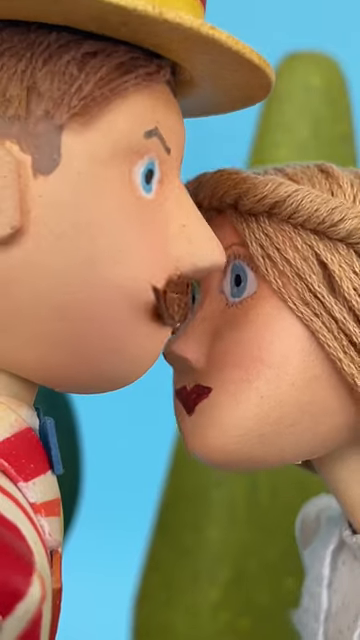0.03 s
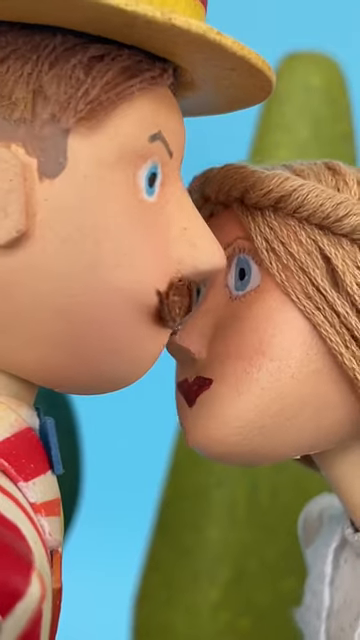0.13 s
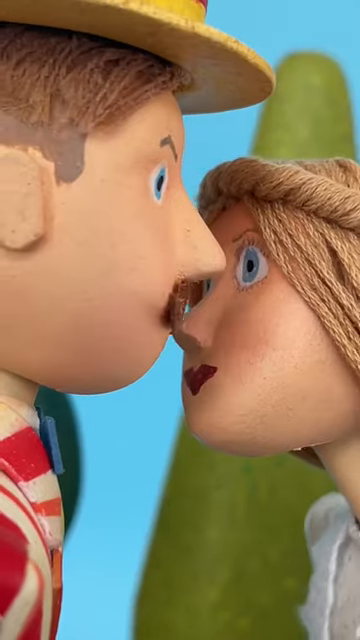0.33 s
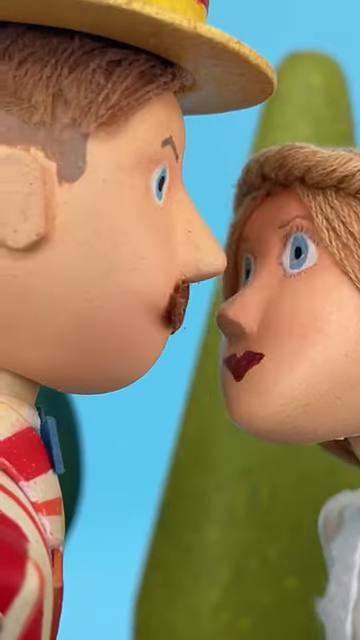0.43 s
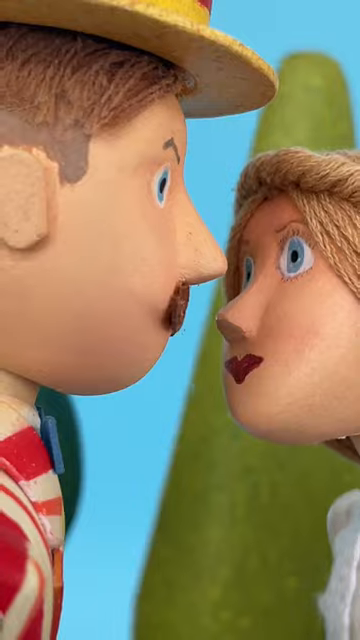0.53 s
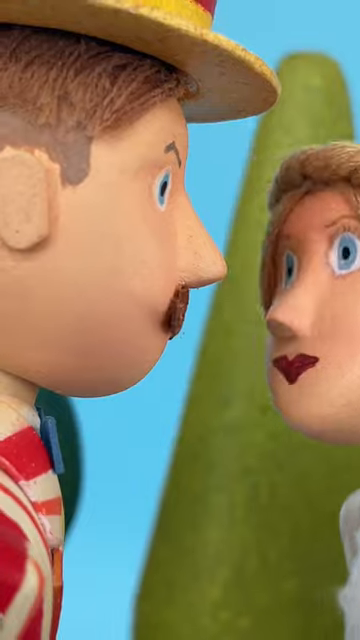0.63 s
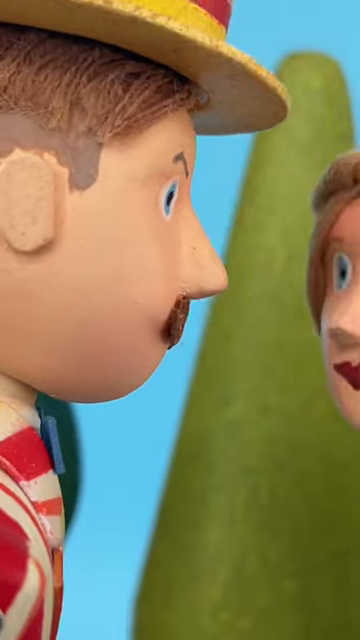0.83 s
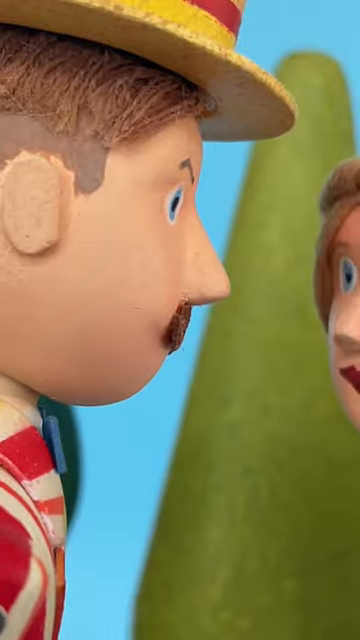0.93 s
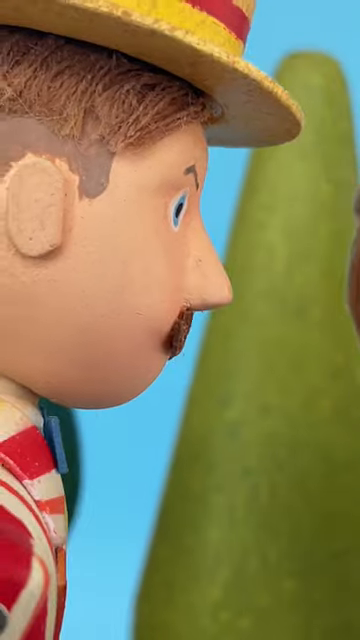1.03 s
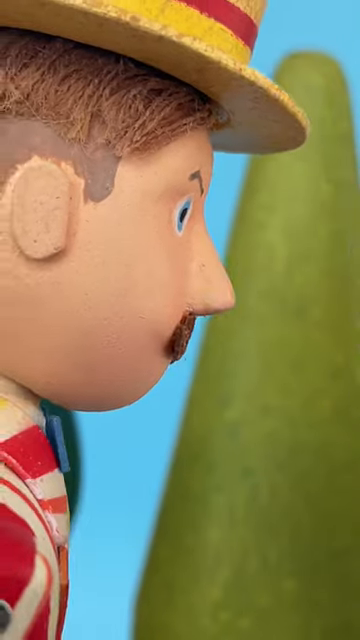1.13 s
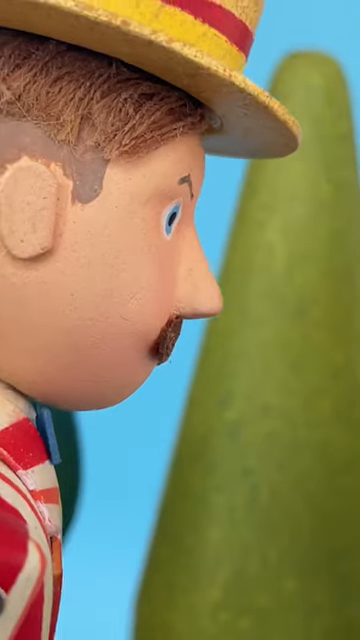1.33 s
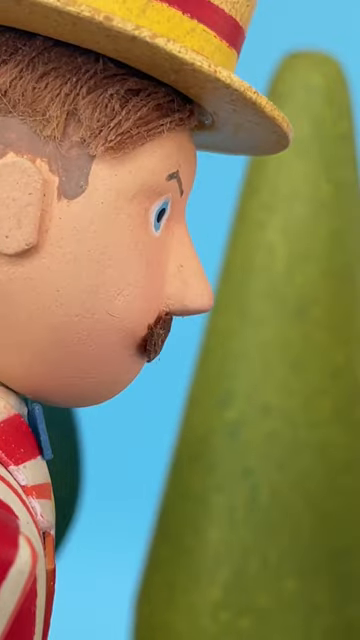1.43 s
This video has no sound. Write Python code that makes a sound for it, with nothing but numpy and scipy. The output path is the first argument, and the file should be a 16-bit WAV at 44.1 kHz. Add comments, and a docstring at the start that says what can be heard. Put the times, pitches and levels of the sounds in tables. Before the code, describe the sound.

A small mechanical figure clicks, clacks and squeaks as it moves in a quiet room.

```python
"""A small mechanical figure moves close to the microphone in a quiet room. From the start its drive rubs
and hums over low room noise, and cams and levers click in a wooden case. About a quarter second in, a dry
pivot slips with a sharp squeak. The frame groans and thumps softly as the load shifts, and a pawl (a small
catch) snaps down. After more clicks and squeaks near 0.7 s comes a lull. Soft groans return around 1 s,
a bunch of clicks follows near 1.2 s, and a few single clicks end the scene."""
import sys
import numpy as np
from scipy import signal
from scipy.fft import rfft, irfft
from scipy.io import wavfile
from scipy.ndimage import uniform_filter1d

SR = 44100
rng = np.random.default_rng(int(sys.argv[2]) if len(sys.argv) > 2 else 0)


def put_to_file(sound):
    """Save the sound as 16-bit audio at rate SR, in the file named by the first command-line argument."""
    columns = np.atleast_2d(sound).T  # one column per channel
    safe = np.clip(columns, -1, 1)
    whole_steps = np.round(safe * 32767)
    wavfile.write(sys.argv[1], SR, whole_steps.astype(np.int16))


N = 66150  # 1.5 seconds

# Tone of the room noise: frequency_hz, gain_db
ROOM_NOISE_TONE = [(25, -12), (55, 1.5), (130, 2.5), (400, -4), (900, -13), (1500, -24), (2200, -20.5),
                   (5000, -40), (10000, -36), (14000, -53.5)]
# Room echo (t60 is the time to fade by 60 dB): low_hz, high_hz, t60_s, gain_db
ECHO_BANDS = [(111, 413, 0.77, -3.5), (360, 2110, 0.41, -7.5), (1326, 4500, 0.14, -10.5),
              (2770, 11300, 0.32, -8), (9000, 23000, 0.12, -7)]
# How loudly the drive rubs over time: time_s, level_db
RUB_LEVELS = [(0, -70.5), (.09, -68), (.13, -60), (.18, -62.5), (.26, -62), (.38, -55), (.46, -69),
              (.62, -57), (.76, -76.5), (.9, -79), (.98, -64.5), (1.05, -77), (1.2, -57.5), (1.29, -75.5),
              (1.38, -69.5), (1.5, -64.5)]
# Tone of the rubbing: frequency_hz, gain_db
RUB_TONE = [(30, -17.5), (70, -4.5), (150, -6), (300, 12.5), (400, 3), (600, 4), (1000, 1), (1500, -9.5),
            (2200, -6.5), (3500, -12.5), (6000, -16), (10000, -29), (14000, -40.5)]
# Notes in the drive's hum at average load: pitch_hz, level_db
HUM_NOTES = [(107, -73), (140, -72.5), (220, -77.5)]
# Groans and thumps of the frame: peak_time_s, pitch_hz, rise_s, fall_s, level_db
FRAME_GROANS = [(0.116, 335.6, 0.0063, 0.032, -53), (.212, 326, 0.0096, 0.024, -47),
                (0.276, 222, 0.011, 0.18, -57.5), (0.323, 106, .035, 0.033, -56),
                (.31, 306.4, 0.031, 0.019, -50.5), (0.387, 101.6, 0.011, 0.017, -44.5),
                (0.412, 332, 0.0078, 0.034, -54), (0.418, 55, .04, 0.19, -56.5),
                (0.451, 125, 0.047, 0.058, -57), (.555, 296, 0.0057, 0.036, -55.5),
                (0.579, 139.8, 0.033, 0.029, -50.5), (0.98, 327.6, .012, 0.021, -50.5),
                (1.012, 311.8, 0.0089, 0.0078, -50.5), (1.038, 289, 0.0034, 0.009, -53),
                (1.181, 124.4, 0.016, 0.043, -58.5)]
# Squeaks of dry pivots: peak_time_s, pitch_hz, glide_hz_per_s, rise_s, fall_s, level_db
PIVOT_SQUEAKS = [(.014, 3870, -7, 0.0034, 0.019, -68), (.2414, 4185, -95000, 0.0024, .0031, -21.5),
                 (.3064, 3780, -10000, 0.0014, 0.00084, -40), (.3103, 3520, -55000, 0.0021, 0.0045, -35),
                 (.515, 2040, -6, 0.0025, 0.0079, -54.5), (0.6912, 1975, 2, 0.0014, 0.0014, -34.5),
                 (.6962, 2082, 7993, 0.0031, 0.0083, -33.5), (1.041, 3140, 0, 0.0064, 0.017, -60)]
# Drops of the pawl: start_s, level_db
PAWL_DROPS = [(.0626, -51), (.3698, -41), (.691, -58), (1.1782, -69), (1.1818, -62), (1.335, -63)]
# Notes the wooden case rings at: pitch_hz, t60_s, gain_db
CASE_MODES = [(138.5, 0.5, -2.5), (217.4, 0.86, -7.5), (280.9, 0.39, -2.5), (323.7, 0.2, -1.5),
              (427.3, 0.27, -8.5), (491.3, 0.2, -3), (599, 0.19, 0), (679, 0.064, 0.5), (817, 0.051, 6.5),
              (883, 0.055, 9), (983, 0.083, -7.5), (1174, 0.049, 5.5), (1700, 0.073, -1.5)]
# Notes a lever rings at: multiple_of_lever_pitch, t60_s, gain_db
LEVER_MODES = [(1, .018, 3), (1.07, 0.017, -2.5), (1.63, 0.021, -7), (2.3, 0.009, -15.5)]
# The four parts of a click (rows: knock, clack, snap, tick): low_hz, high_hz, decay_s, gain_db
CLICK_PARTS = [(574, 1090, 0.0017, -3.5), (1544, 2600, 0.0041, -10), (2870, 7190, 0.0022, -3.5),
               (6400, 8660, 0.0014, -7.5)]
# Cam and lever hits: start_s, scrape_s, knock_db, clack_db, snap_db, tick_db, lever_pitch_hz, lever_db
CLICK_HITS = [(0.0619, .0001, -84, -66, -59.5, -51, 3250, -59),
              (0.07, 0.0031, -60.5, -54, -63, -92, 2140, -61.5),
              (.1025, 0.0011, -52.5, -45, -49, -53.5, 2346, -47),
              (0.1944, 0.0035, -52, -65, -75, -88, 2040, -70), (.206, 0.01, -53, -67, -82, -78, 2190, -63),
              (0.2415, 0.002, -44, -47, -44, -46, 4120, -45), (.252, 0.0021, -45, -55, -50, -58, 2000, -43),
              (0.2692, 0.0022, -40, -52, -77, -72, 1890, -44),
              (0.2717, 0.00088, -46, -37, -46.5, -38.5, 3870, -42),
              (0.31, 0.00058, -59.5, -63, -52, -51, 2100, -58),
              (0.3686, 0.0011, -51, -63, -51, -42, 1720, -61),
              (0.3953, 0, -44.5, -49.5, -60, -89, 1147, -43.5),
              (.469, 0.00082, -51, -48, -51, -71, 4960, -48), (.5362, 0, -42, -47.5, -89, -91, 1637, -45.5),
              (.5409, 0.0014, -48.5, -51.5, -70, -95, 1980, -66),
              (0.593, 0, -62.5, -58, -71, -63, 2270, -71),
              (0.6078, 0.00088, -55.5, -44, -52, -55, 2194, -43),
              (.645, 0, -52.5, -47, -55.5, -67.5, 2360, -48), (0.6504, 0, -49, -50, -56.5, -71, 1920, -56),
              (.6898, 0.002, -49.5, -41, -57, -57, 2130, -47.5),
              (.7025, 0.0014, -39, -58, -86, -100, 995, -42.5), (.839, 0, -58, -81, -93, -81, 1500, -84),
              (0.8666, 0.0041, -74, -68, -72, -65.5, 1700, -68),
              (.886, 0.00038, -63, -62, -71, -66, 1760, -62.5),
              (0.9359, .0007, -50.5, -46.5, -53.5, -48, 2243, -49),
              (0.9586, 0, -53, -82, -66, -88, 1060, -58), (.967, 0.0013, -53.5, -69, -64, -79, 1700, -79),
              (.982, 0.00088, -66, -79, -60.5, -81, 2920, -56.5),
              (0.9932, 0.0017, -73, -59.5, -63, -74, 2430, -57.5),
              (1.0313, 0.0013, -67, -56.5, -66.5, -76, 3080, -58.5),
              (1.069, 0.0035, -51.5, -64, -75, -84, 1700, -75),
              (1.0935, 0, -71, -66, -62.5, -84, 3190, -57),
              (1.114, 0.0029, -57, -58.5, -68.5, -92, 1260, -58),
              (1.153, 0.0012, -50, -63, -65, -85, 1730, -52), (1.1772, 0, -40, -43, -44, -39, 4730, -46),
              (1.1812, .0001, -55, -51, -54, -52, 3320, -51),
              (1.2114, 0.0039, -48.5, -51.5, -55, -66, 2810, -48),
              (1.215, 0.00054, -47, -47, -56.5, -72, 2095, -46),
              (1.2195, .0005, -49.5, -53, -64, -79, 2290, -55),
              (1.269, 0.0017, -53.5, -55, -55.5, -49, 3260, -53.5),
              (1.335, 0.00081, -47, -45, -48.5, -50.5, 2870, -46.5),
              (1.461, 0.00017, -55.5, -55.5, -73, -82, 1860, -61.5),
              (1.473, 0.0051, -54, -54, -72, -65, 2160, -62.5)]
# How much louder the left side is than the right: frequency_hz, difference_db
LEFT_MINUS_RIGHT = [(40, 0), (125, -1.5), (250, -3), (500, -3.6), (1000, -.4), (2000, 0), (12000, .5)]
# How far the right side lags behind the left: frequency_hz, phase_radians
RIGHT_LAG = [(0, 0), (150, .13), (600, .7), (2000, .48), (4200, .85), (8800, 4.0), (10200, 4.3),
             (12500, 7.7)]

OPPOSITE_SIDES = np.array([[1], [-1]])  # adds a sound on the left and subtracts it on the right


def undb(db):
    """Turn decibels into a gain to multiply by."""
    return 10 ** (np.asarray(db) / 20)


def unit(x):
    """Scale a sound to an average strength (rms) of 1."""
    return x / np.sqrt(np.mean(x ** 2) + 1e-30)


def band(x, low_hz, high_hz, order=2):
    """Keep the part of a sound between two frequencies."""
    edges = [low_hz, min(max(high_hz, low_hz + 20), SR / 2 - 20)]
    return signal.sosfilt(signal.butter(order, edges, "band", fs=SR, output="sos"), x)


def shape_tone(x, points):
    """Turn lows and highs up or down along (frequency_hz, gain_db) points."""
    hz, db = np.array(points, float).T
    bins_hz = np.maximum(np.fft.rfftfreq(N, 1 / SR), 1)
    return irfft(rfft(x) * undb(np.interp(np.log(bins_hz), np.log(hz), db)), N)


def wobble(changes_per_s):
    """A smooth random wiggle with a typical size of 1."""
    hold = int(SR / changes_per_s)
    steps = np.repeat(rng.standard_normal(N // hold + 1), hold)
    return unit(uniform_filter1d(uniform_filter1d(steps, hold), hold)[:N])


def swell(t, rise_s, fall_s):
    """A rounded rise to t = 0 and a rounded fall after it."""
    return np.exp(-(t / np.where(t < 0, rise_s, fall_s)) ** 2)


def add(out, x, start_s):
    """Mix a short sound in at its time."""
    i = max(int(start_s * SR), 0)
    out[i:i + len(x)] += x[:max(N - i, 0)]


def even_energy(x, span_s=0.0094):
    """Give a burst as much energy as a steady level of 1 lasting span_s."""
    return x * np.sqrt(span_s * SR / np.sum(x ** 2))


def ring(modes, t, scatter):
    """A struck part's fading notes; random signs stand for where it is hit, pitch scatter for its load."""
    signs = rng.choice([-1, 1], len(modes))
    detunes = 1 + scatter * rng.standard_normal(len(modes))
    return sum(sign * undb(db) * np.sin(2 * np.pi * hz * detune * t) * np.exp(-np.log(1000) * t / t60)
               for (hz, t60, db), sign, detune in zip(modes, signs, detunes))


def room_noise(level_db=-64):
    """A low, steady rush, almost the same on both sides."""
    middle, side = (unit(shape_tone(rng.standard_normal(N), ROOM_NOISE_TONE)) for _ in range(2))
    return undb(level_db) * (middle + 0.13 * band(side, 250, 14400, order=1) * OPPOSITE_SIDES)


def room_echo(x, onset_s=0.00058, width=0.32):
    """Reflections blur into a short, dull tail that is a little different at each ear."""
    t = np.arange(N // 2) / SR
    tails = []
    for _ in range(2):
        response = 0
        for low_hz, high_hz, t60, db in ECHO_BANDS:
            fade = (1 - np.exp(-t / onset_s)) * np.exp(-np.log(1000) * t / t60)
            fading_noise = rng.standard_normal(len(t)) * fade / np.sqrt(np.sum(fade ** 2))
            response = response + undb(db) * band(fading_noise, low_hz, high_hz)
        tails.append(signal.fftconvolve(x, response)[:N])
    middle, side = tails
    return middle + width * side * OPPOSITE_SIDES


def drive(grains_per_s=5000, spread_db=3.5, waver_db=0.5, hum_follows=0.68):
    """Sliding parts rub in many tiny grains of sound over a wavering hum; both swell with the load."""
    t = np.arange(N) / SR
    load_db = np.interp(t, *np.array(RUB_LEVELS).T)
    grains = (rng.random(N) < grains_per_s / SR) * rng.choice([-1, 1], N)
    strengths = undb(spread_db * np.minimum(rng.exponential(size=N), 3))
    rub = unit(shape_tone(grains * strengths, RUB_TONE)) * undb(load_db)
    hum = sum(undb(db - waver_db * wobble(9.2)) * np.sin(2 * np.pi * hz * t + wobble(13.8))
              for hz, db in HUM_NOTES)
    return rub + hum * undb(hum_follows * (load_db - load_db.mean()))


def frame_groans(roughness=0.33):
    """The frame shudders briefly at one low pitch as the load shifts."""
    out = np.zeros(N)
    for peak_s, hz, rise_s, fall_s, db in FRAME_GROANS:
        t = np.arange(N) / SR - peak_s
        loudness = undb(db) * swell(t, rise_s, fall_s) * (1 + roughness * wobble(hz / 2))
        out += loudness * np.sin(2 * np.pi * hz * t + roughness * wobble(hz / 2))
    return out


def pivot_squeaks(jitter_radians=0.38, rasp=0.2, octave_db=-34):
    """A dry pivot slips for a moment and gives a slightly raspy squeak that can slide in pitch."""
    out = np.zeros(N)
    for peak_s, hz, glide, rise_s, fall_s, db in PIVOT_SQUEAKS:
        t = np.arange(N) / SR - peak_s
        phase = 2 * np.pi * (hz * t + glide * t ** 2 / 2) + jitter_radians * wobble(700)
        loudness = undb(db) * swell(t, rise_s, fall_s) * (1 + rasp * wobble(1500))
        out += loudness * (np.sin(phase) + undb(octave_db) * np.sin(2 * phase))
    return out


def pawl_drops(decay_s=0.00074):
    """A hard pawl drops with a dry, glassy crack about a millisecond long."""
    out, t = np.zeros(N), np.arange(N // 50) / SR
    for start_s, db in PAWL_DROPS:
        hiss = unit(band(rng.standard_normal(len(t)), low_hz=6440, high_hz=11100))
        add(out, hiss * np.exp(-t / decay_s) * undb(db), start_s)
    return out


def cam_and_lever_clicks(attack_s=0.00024, case_gain_db=-7, lever_gain_db=-6.5):
    """Each hit is a crack of noise, longer if it scrapes, that sets the case and one lever ringing."""
    knocks, ticks, t = np.zeros(N), np.zeros(N), np.arange(8192) / SR
    layers = (knocks, knocks, knocks, ticks)  # the bright ticks stay apart so they can get less echo
    for start_s, scrape_s, *parts_db, lever_hz, lever_db in CLICK_HITS:
        push = 1 - np.exp(-t / (attack_s + scrape_s))
        for (low_hz, high_hz, decay_s, gain_db), db, layer in zip(CLICK_PARTS, parts_db, layers):
            burst = rng.standard_normal(len(t)) * push * np.exp(-t / (decay_s + scrape_s))
            crack = even_energy(band(burst + 1e-18, low_hz, high_hz))
            add(layer, crack * undb(db + gain_db), start_s)
        case = even_energy(ring(CASE_MODES, t, scatter=0.025) * push)
        add(knocks, case * undb(parts_db[0] + case_gain_db), start_s)  # as strong as the knock allows
        modes = [(multiple * lever_hz, t60, db) for multiple, t60, db in LEVER_MODES]
        lever = even_energy(ring(modes, t, scatter=0) * push)
        add(knocks, lever * undb(lever_db + lever_gain_db), start_s)
    return knocks, ticks


def scene():
    """Mix the figure, its echo and the room noise; only the pawl keeps its highest treble."""
    knocks, ticks = cam_and_lever_clicks()
    body = knocks + drive()
    squeaks, groans = pivot_squeaks(), frame_groans()
    echo = room_echo(body + undb(-5) * ticks + undb(-9.5) * squeaks + undb(-7.5) * groans)
    mix = body + ticks + squeaks + groans + echo + room_noise()
    soft_top = signal.butter(12, 12800, "lowpass", fs=SR, output="sos")
    return signal.sosfilt(soft_top, mix) + pawl_drops()


def record(dry, dip_hz=(7150, 8050), top_hz=15800):
    """Two close microphone openings: left thinner, right slightly later; a treble dip and a cut top."""
    left = shape_tone(dry[0], [(hz, db / 2) for hz, db in LEFT_MINUS_RIGHT])
    right = shape_tone(dry[1], [(hz, -db / 2) for hz, db in LEFT_MINUS_RIGHT])
    lag_radians = np.interp(np.fft.rfftfreq(N, 1 / SR), *np.array(RIGHT_LAG).T)
    right = irfft(rfft(right) * np.exp(-1j * lag_radians), N)
    treble_dip = signal.butter(2, dip_hz, "bandstop", fs=SR, output="sos")
    top_cut = signal.ellip(8, .2, 70, top_hz, fs=SR, output="sos")
    return signal.sosfilt(top_cut, signal.sosfilt(treble_dip, np.array([left, right])))


dry = scene()
out = record(dry)
put_to_file(out)
```